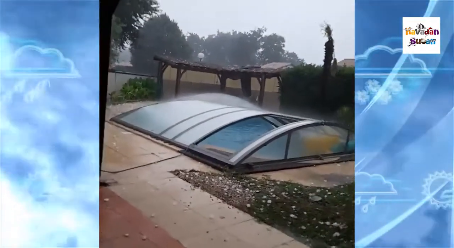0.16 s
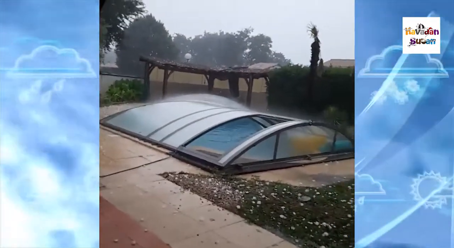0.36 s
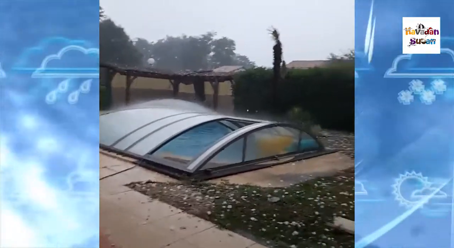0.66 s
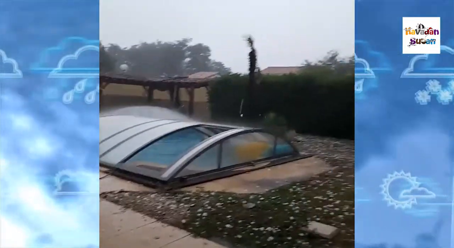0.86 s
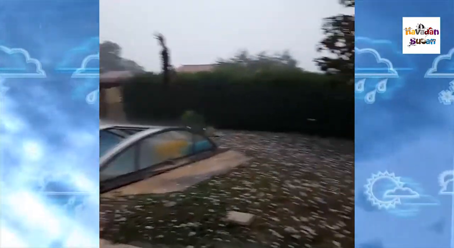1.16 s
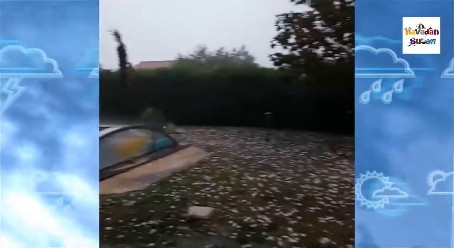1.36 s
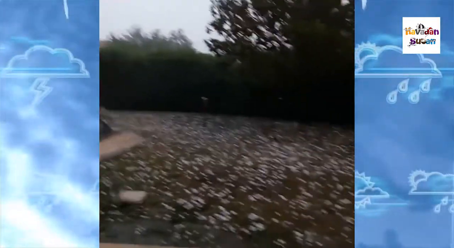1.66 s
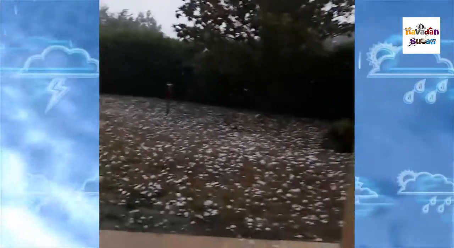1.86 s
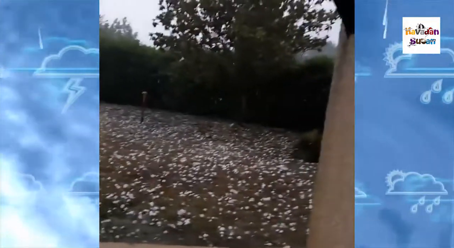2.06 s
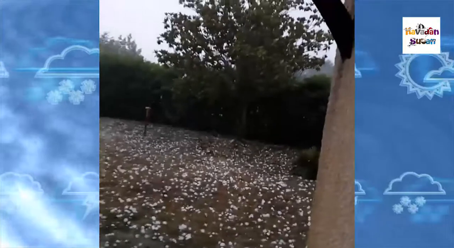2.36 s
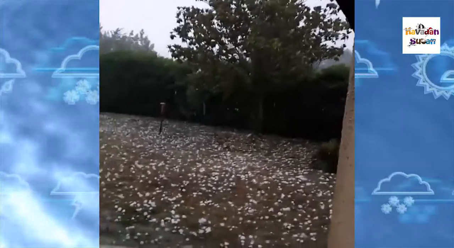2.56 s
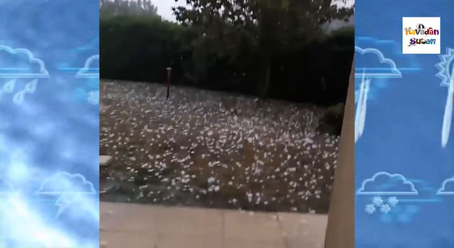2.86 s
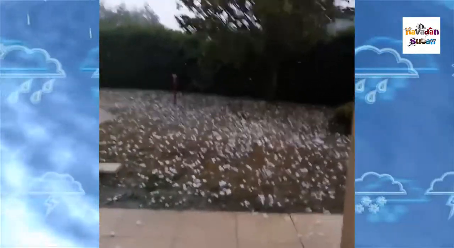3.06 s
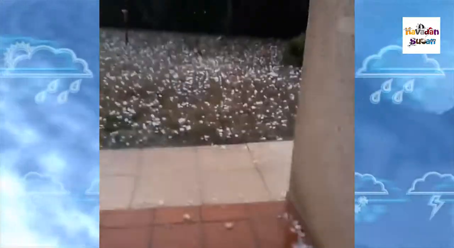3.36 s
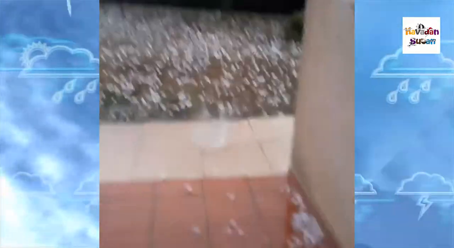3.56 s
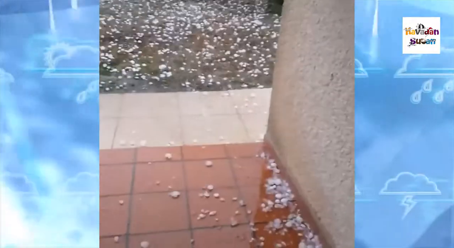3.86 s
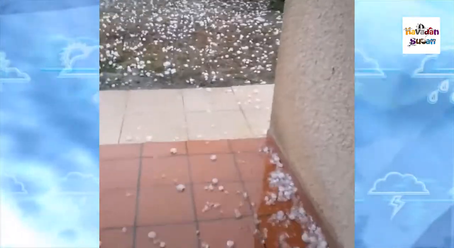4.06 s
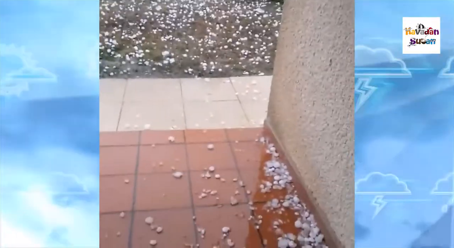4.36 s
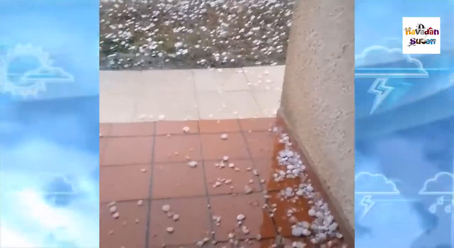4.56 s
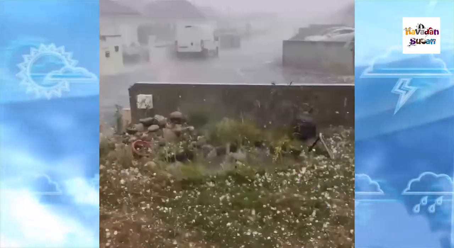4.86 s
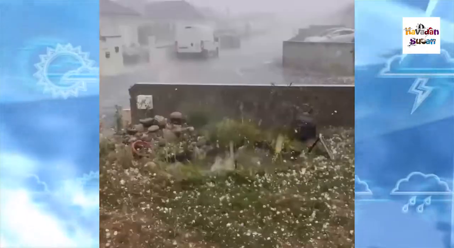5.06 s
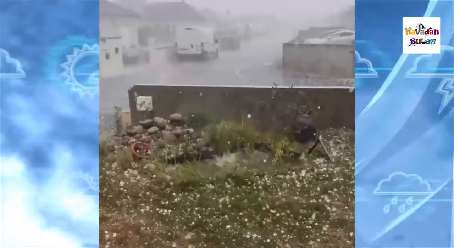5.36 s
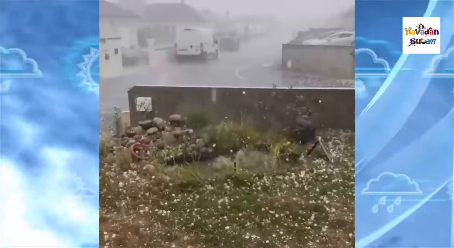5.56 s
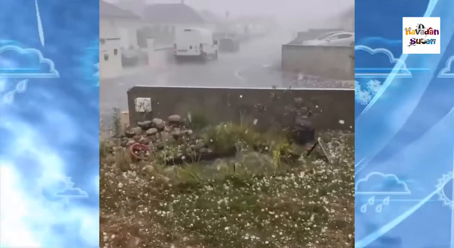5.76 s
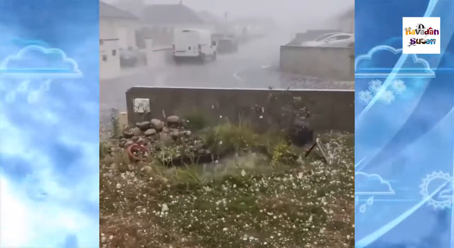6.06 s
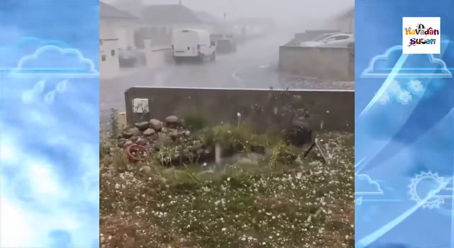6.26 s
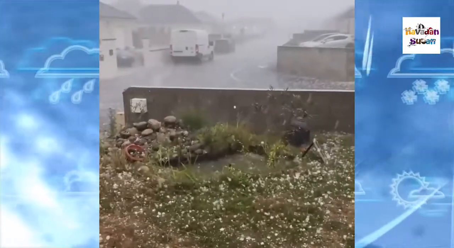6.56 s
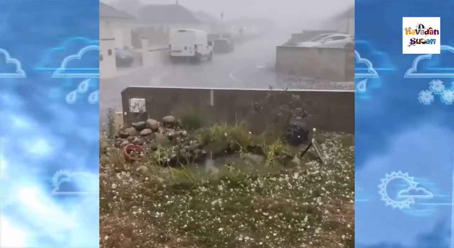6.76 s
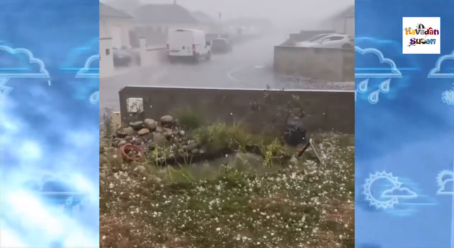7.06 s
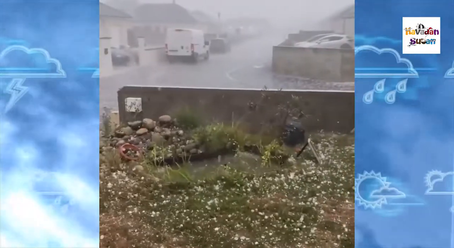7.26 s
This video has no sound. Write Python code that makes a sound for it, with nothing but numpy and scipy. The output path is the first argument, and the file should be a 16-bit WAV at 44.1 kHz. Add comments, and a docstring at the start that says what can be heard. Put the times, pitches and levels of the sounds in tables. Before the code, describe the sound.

Close, loud and chaotic hailstorm, heard from under a roof beside a garden and covered pool. Stones thump overhead, snap on paving and scatter splinters, with an early metallic zing and a bright hollow knock after two seconds. After a tiny gap near 4.9 seconds, the view changes to a street: even, bright hiss, small metal ticks, a few dull single hits and faint house rumble.

```python
"""Hailstorm on a porch roof

Hail drums on a porch roof; big stones thud on it, crack on tiles and knock on garden things, over the patter
on lawn and pool enclosure. After a brief near-silence the street side follows: a steadier hiss, metal pings,
a rumble on the house and duller single stones. Showers are random impulses through decaying noise bursts;
thuds, cracks, knocks and a zing are struck bodies: damped modes and coloured noise with an echo."""
import sys
import numpy as np
from scipy import signal
from scipy.fft import rfft, irfft, next_fast_len
from scipy.io import wavfile
from scipy.ndimage import uniform_filter1d

SR = 44100
rng = np.random.default_rng(int(sys.argv[2]) if len(sys.argv) > 2 else 0)


def master_out(mix):
    """Clip the mix to full scale and print it as 16-bit PCM to the path in sys.argv[1]."""
    frames = np.transpose(np.atleast_2d(mix))
    ceiling = np.clip(frames, -1, 1)
    pcm = np.round(ceiling * 32767).astype(np.int16)
    wavfile.write(sys.argv[1], SR, pcm)


N = 325899
TIME = np.arange(N) / SR
HIT_TIME = np.arange(8192) / SR
HIT_HZ = np.fft.rfftfreq(len(HIT_TIME), 1 / SR)
HIT_TAPER = np.cos(np.pi / 2 * HIT_TIME / HIT_TIME[-1])  # brings every hit to silence at its end
GARDEN_END_S, STREET_START_S = 4.84, 4.912


def amp(db):
    """Level law: decibels to amplitude gain."""
    return 10 ** (np.asarray(db) / 20)


def read(table, hz):
    """Spectral interpolation: a table's columns at the given frequencies, joined on a log axis."""
    table_hz, *columns = np.transpose(table)
    return [np.interp(np.log(hz + 1), np.log(table_hz), column) for column in columns]


def follow(table):
    """Envelope interpolation: a level curve at every sample."""
    return np.interp(TIME, *np.transpose(table))


def swing(level_db, during):
    """Relative level: how far a curve lies above its mean over a stretch of time, in dB."""
    return level_db - level_db[during].mean()


def add(mix, start_s, sound):
    """Superposition: adds a two-channel sound to the mix at its start time."""
    part = mix[:, max(round(start_s * SR), 0):][:, :sound.shape[1]]
    part += sound[:, :part.shape[1]]


def split(x, edge_hz):
    """Band division: the parts of a sound below and above an edge frequency."""
    return [signal.sosfilt(signal.butter(3, edge_hz, kind, fs=SR, output="sos"), x)
            for kind in ("low", "high")]


def evened(x):
    """Power normalisation: removes slow level drift, leaving the mean of the channels at rms 1."""
    return x / np.sqrt(abs(uniform_filter1d(x.mean(0) ** 2, size=6000)) + 1e-12)


def peaked(x):
    """Peak normalisation: the channel mean has rms 1 in its loudest few milliseconds."""
    return x / np.sqrt(uniform_filter1d(x.mean(0) ** 2, size=180).max())


def colour(x, gain_db):
    """Minimum-phase filtering with the gain at HIT_HZ: it rings after a blow, never before."""
    log_gain = np.log(amp(np.maximum(gain_db, gain_db.max() - 90)))
    circle = np.concatenate([log_gain, log_gain[-2:0:-1]])
    # the Hilbert transform of the log gain gives the causal phase
    taps = np.fft.ifft(np.exp(signal.hilbert(circle).conj())).real[:len(HIT_HZ) // 2]
    return signal.oaconvolve(x, taps[None], axes=1)[:, :x.shape[1]]


def resonance_db(hz, q):
    """Resonance curve: the gain at HIT_HZ of one damped mode."""
    ratio = (HIT_HZ + 1) / hz
    return -10 * np.log10(1 + (q * (ratio - 1 / ratio)) ** 2)


# the two microphone ports, on the garden and the street side
# columns: frequency_hz, likeness (0-1), left_phase_lag_rad, left_minus_right_db
GARDEN_SPACING = [(99, 0.97, -0.18, -1), (246, 0.98, -0.047, -1), (405, 0.71, 0.31, -2.5),
                  (686, 0.7, -0.013, 2), (1000, 0.22, -0.44, -2), (2440, 0.31, -0.51, 0.5),
                  (3280, 0, 0.56, -1), (8000, 0.14, -0.54, -0.5)]
STREET_SPACING = [(89.5, 0.98, 0.26, -1), (260, 1, 1.4, -12), (356, 0.59, 0.68, -12), (495, 0.17, 3.6, -8),
                  (545, 0.97, 3.2, 1.5), (666, 0.93, 3.2, 0), (737, 0.74, 3.8, -2), (970, 0.35, 3.8, -3),
                  (1250, 0.98, 4.4, 0.5), (1820, 0.47, 4.1, -3), (2230, 0.89, 3.1, -0.5),
                  (3300, 0.66, 3.66, -3), (3760, 0.53, 4.7, -1), (4230, 0.65, 4.08, -2),
                  (7130, 1, 4.62, -0.5), (13200, 0.27, 0.23, 0.5)]


def ports(x, table):
    """Spatial coherence: mixes two unrelated sounds into two ports, with likeness and lag set by frequency."""
    size = next_fast_len(x.shape[1] + len(HIT_HZ))
    likeness, lag, balance_db = read(table, np.fft.rfftfreq(size, 1 / SR))
    a, b = rfft(x, size)
    common = np.sqrt((1 + likeness) / 2) * a
    apart = np.sqrt((1 - likeness) / 2) * b
    left = (common + apart) * np.exp(-1j * lag) * amp(balance_db / 2)
    right = (common - apart) * amp(-balance_db / 2)
    return irfft(np.array([left, right]), size)[:, :x.shape[1]]


def burst(ring_s, echo_db, echo_t60):
    """Impact and reverberation: a quickly dying rattle with weaker scatter from walls and ground."""
    echo = amp(echo_db) * np.exp(-np.log(1000) * HIT_TIME / echo_t60)
    envelope = np.exp(-HIT_TIME / ring_s) + echo
    return rng.standard_normal((2, len(HIT_TIME))) * envelope * HIT_TAPER


def ringing(gain_db, envelope):
    """Modal density: many close modes sound together as coloured noise under one envelope."""
    x = colour(rng.standard_normal((2, 2 * len(HIT_TIME))), gain_db)
    x = x / np.sqrt(abs(uniform_filter1d(x ** 2, size=440)) + 1e-20)
    return x[:, len(HIT_TIME):] * envelope / envelope.max() * HIT_TAPER


def shower(per_s, spread_db, low_hz, high_hz, q, ring_s, echo_db, echo_t60, count=14):
    """Poisson impacts: stones of random size fall on many surfaces, each with a pitch of its own."""
    out = np.zeros((2, N))
    for hz in np.geomspace(low_hz, high_hz, count):
        tap = colour(burst(ring_s, echo_db, echo_t60), resonance_db(hz, q))
        gap, size = rng.exponential(1, (2, 2000))
        at = (np.cumsum(gap) * count / per_s * SR).astype(int)
        size = amp(spread_db * np.minimum(size, 4))
        blows = np.bincount(at[at < N], size[at < N], N)
        out += signal.oaconvolve(blows[None], tap, axes=1)[:, :N]
    return out / out.std()


def wash(patchy_db):
    """Incoherent summation: far impacts merge into a hiss whose narrow bands flare up for an instant."""
    z = signal.stft(rng.standard_normal((2, N)), nperseg=512, noverlap=384)[2]
    patches = uniform_filter1d(rng.standard_normal(z.shape[1:]), size=3, axis=0)
    patches = uniform_filter1d(patches, size=9, axis=1)
    patched = z * amp(patchy_db * patches / patches.std())
    hiss = signal.istft(patched, nperseg=512, noverlap=384)[1][:, :N]
    return hiss / hiss.std()


def squalls():
    """Beating of slow sines: uneven swells, a few each second, at rms 1."""
    swell = sum(np.sin(2 * np.pi * (hz * TIME + rng.random())) for hz in np.geomspace(2.5, 11, 12))
    return swell / swell.std()


RUMBLE_DB, RUMBLE_FOLLOWS = -35.5, 1.6  # mean level; dB gained per dB of hiss
# colour of the rumble; columns: frequency_hz, gain_db
HOUSE_COLOUR = [(25, -10), (50, -6), (75, 3), (105, -5.5), (145, 2), (215, -9.5), (290, -9), (400, -19),
                (500, -10), (600, -28), (1000, -66), (4000, -95)]


def house_rumble(hiss_db):
    """Structural resonance: low, heavily damped modes of the house rumble with the fall of hail."""
    level_db = RUMBLE_DB + RUMBLE_FOLLOWS * swing(hiss_db, TIME > STREET_START_S)
    blows = shower(per_s=330, spread_db=2.0, low_hz=70, high_hz=597, q=0.43,
                   ring_s=0.0092, echo_db=-20.0, echo_t60=0.17, count=8)
    rumble = ports(colour(blows, read(HOUSE_COLOUR, HIT_HZ)[0]), STREET_SPACING)
    return amp(level_db) * evened(rumble)


SQUALL_DB = 1.1  # rms swing of the hiss level
# hiss of rain and hail on the street, before the squalls; columns: start_s, level_db
STREET_FALL_LEVEL = [(4.92, -31.5), (5.05, -30), (5.4, -31.5), (6.1, -31), (6.27, -33), (6.57, -29.5),
                     (6.67, -31.5), (7.25, -33), (7.39, -30.5)]
# colour of the hiss; columns: frequency_hz, gain_db
STREET_COLOUR = [(200, -30), (420, -10), (500, -2), (545, 0), (585, 6), (650, 0), (720, 6.5), (810, 4),
                 (860, 1), (910, 3.5), (1030, -1), (1130, 1.5), (1230, -1), (1800, 1), (2900, -1),
                 (4000, -4), (5100, -8.5), (6200, -7.5), (7400, -11), (8500, -17.5), (10000, -15.5),
                 (12800, -16.5), (14800, -40)]


def street():
    """Distributed sources: rain and hail hiss on the road and ping on cars and gutters to the right."""
    hiss_db = follow(STREET_FALL_LEVEL)
    ticks = shower(per_s=900, spread_db=1.7, low_hz=900, high_hz=7000, q=2.5,
                   ring_s=.0009, echo_db=-20, echo_t60=.12)
    pings = shower(per_s=650, spread_db=1.7, low_hz=780, high_hz=3400, q=16,
                   ring_s=.002, echo_db=-18, echo_t60=.2, count=20)[0]
    # sound from the right reaches the left port half a millisecond later
    pings = np.array([.8 * np.interp(TIME - .0005, TIME, pings), pings])
    fall = ports(wash(patchy_db=2.6) + amp(-8) * ticks, STREET_SPACING) + amp(-13.5) * pings
    hiss = evened(colour(fall, read(STREET_COLOUR, HIT_HZ)[0]))
    return amp(hiss_db + SQUALL_DB * squalls()) * hiss + house_rumble(hiss_db)


CLATTER_DB, CLATTER_FOLLOWS = -32.5, 0.53  # mean level; dB gained per dB of drumming
# fine spray of small ice and rain on the paving; columns: start_s, level_db
SPRAY_LEVEL = [(0.0, -32.5), (0.3, -29), (0.44, -28), (0.72, -28.5), (0.96, -33), (1.08, -32), (1.4, -31),
               (1.56, -31.5), (1.78, -33), (2.4, -34), (2.56, -32.5), (3.38, -30.5), (3.8, -33),
               (4.0, -29.5), (4.2, -31), (4.33, -28.5), (4.53, -32), (4.83, -27)]
# colour of the patter; columns: frequency_hz, gain_db
GARDEN_COLOUR = [(100, -45), (400, -9.5), (800, 4.5), (1400, 2.5), (2000, -0.5), (3000, -9), (4500, -15),
                 (6000, -14), (7500, -16.5), (8300, -22), (12000, -18.5), (15000, -23.5), (16000, -14.5)]


def garden():
    """Near and far field: close stones clatter, others tap the pool enclosure, over the wash of far ones."""
    clatter_db = CLATTER_DB + CLATTER_FOLLOWS * swing(follow(HAIL_LEVEL), TIME < GARDEN_END_S)
    near = shower(per_s=420, spread_db=2.7, low_hz=600, high_hz=7000, q=1.8,
                  ring_s=.0013, echo_db=-17, echo_t60=.16, count=24)
    taps = shower(per_s=150, spread_db=1.2, low_hz=579, high_hz=1900, q=22,
                  ring_s=.003, echo_db=-8, echo_t60=.2, count=18)
    fall = amp(-7.5) * near + amp(-13) * taps + wash(patchy_db=4)
    fall = ports(colour(fall, read(GARDEN_COLOUR, HIT_HZ)[0]), GARDEN_SPACING)
    clatter, spray = split(fall, 3300)
    return amp(clatter_db) * evened(clatter) + amp(follow(SPRAY_LEVEL)) * evened(spray)


def by_wall(s):
    """Listening position: the listener turns from the porch's edge (0) to its side wall (1)."""
    return np.interp(s, [1.6, 2.5], [0, 1])


HOLLOW_SHARE = 0.37  # part of the drumming's power in the hollow upper tone
# drumming of hail on the porch; columns: start_s, level_db
HAIL_LEVEL = [(0.0, -27), (0.2, -26.5), (0.42, -17.5), (0.85, -20), (0.98, -22), (1.15, -18), (1.41, -19.5),
              (1.57, -16), (1.8, -27.5), (2.42, -27.5), (2.58, -21.5), (2.92, -20.5), (3.02, -16.5),
              (3.35, -21.5), (3.5, -23.5), (3.82, -27.5), (4.23, -25), (4.33, -17.5), (4.5, -26),
              (4.68, -17.5), (4.83, -20.5)]
# the roof's ring; columns: frequency_hz, gain_at_edge_db, gain_by_wall_db
ROOF_RING = [(25, -32, -43), (38, -16, -22), (50.6, -6, -11), (79, -0.5, 0.5), (93, -0.5, 1),
             (138.3, -3, -1), (195, -9, -12.5), (204, -4.5, -14.5), (231, -2, -5), (300, -7, -4),
             (380, -7.5, -7), (464, -4, -10), (717, -11.5, -11), (750, -16, -15.5), (1580, -15, -21),
             (8200, -75, -85)]


def roof():
    """Panel resonance: countless stones drum on the roof as a boom and a hollow upper tone."""
    blows = shower(per_s=520, spread_db=2.0, low_hz=64.0, high_hz=1510, q=0.55,
                   ring_s=0.0057, echo_db=-13.5, echo_t60=0.17, count=12)
    panes = shower(per_s=130, spread_db=2, low_hz=200, high_hz=750, q=14,
                   ring_s=.003, echo_db=-20, echo_t60=.25, count=13)
    struck = blows + amp(-5.0) * panes
    edge, wall = (colour(struck, gain_db) for gain_db in read(ROOF_RING, HIT_HZ))
    panel = ports(edge + by_wall(TIME) * (wall - edge), GARDEN_SPACING)
    boom, hollow = split(panel, 190)
    drumming = np.sqrt(1 - HOLLOW_SHARE) * evened(boom) + np.sqrt(HOLLOW_SHARE) * evened(hollow)
    return amp(follow(HAIL_LEVEL)) * drumming


KNOCK_RING_S, KNOCK_ECHO_RISE_S, KNOCK_ECHO_S = 0.0043, 0.009, 0.06
CLUNK_DB = -10  # broad body of a knock, against its ring
# what a struck thing rings with; columns: pitch_ratio (to the knock's pitch), gain
KNOCK_PARTIALS = [(.91, 0.58), (1.064, 0.74), (2.3, 0.047)]


def knock(hz, echo_db):
    """Modal ringing: two close modes and a faint upper one over a broad clunk; a lower echo lingers."""
    age = HIT_TIME / KNOCK_RING_S
    modes = sum(gain * np.sin(2 * np.pi * hz * ratio * HIT_TIME) for ratio, gain in KNOCK_PARTIALS)
    ring = age * np.exp(-age) * modes
    scatter = (1 - np.exp(-HIT_TIME / KNOCK_ECHO_RISE_S)) ** 2 * np.exp(-HIT_TIME / KNOCK_ECHO_S)
    echo = ringing(2 * resonance_db(hz * 0.9, q=2.8), scatter)
    clunk = ringing(resonance_db(hz, q=1.2), np.sqrt(age) * np.exp(-age / 2))
    return peaked(np.array([ring, .5 * ring])) + amp(echo_db) * echo + amp(CLUNK_DB) * clunk


# stones on hollow or metal things; columns: start_s, level_db, pitch_hz, echo_db (against the ring)
KNOCK_HITS = [(0.408, -18, 1180, -6), (0.411, -27, 1634, -5), (0.872, -23, 940, -6),
              (1.226, -15.5, 678, -10), (1.36, -20.5, 940, -8), (1.432, -23.5, 1330, -5),
              (1.467, -27, 1320, -4.5), (1.552, -20, 674, -6), (2.197, -11.5, 1250, -8.5),
              (2.745, -27, 990, -3), (3.849, -18, 1160, -9), (3.864, -18.5, 1245, -6),
              (3.884, -27, 1720, -3), (3.891, -24, 1290, -10), (4.612, -32, 1080, -12),
              (5.035, -27.5, 1730, -8), (5.428, -34, 980, -7), (5.511, -30.5, 1980, -4),
              (5.597, -31, 2650, -12), (5.664, -29, 3710, -7), (5.712, -29, 2300, -12),
              (5.788, -29.5, 1850, -9), (5.897, -30.5, 3270, -16), (6.062, -31, 1890, -6),
              (6.478, -30, 1890, -1), (6.572, -29, 2830, -8), (6.731, -36, 1840, 2),
              (6.79, -30.5, 1170, -17), (6.808, -27.5, 1950, -7), (7.176, -32, 1820, -9),
              (7.346, -29, 925, -5)]


def knocks():
    """Struck hollow bodies: each stone sounds the pitch of the thing it hits."""
    out = np.zeros((2, N))
    for start_s, level_db, hz, echo_db in KNOCK_HITS:
        add(out, start_s, amp(level_db) * knock(hz, echo_db))
    return out


ZING_START_S, ZING_DB, ZING_FADE_S = .171, -21, 0.018
ZING_HZ, ZING_SAG_HZ_PER_S, ZING_WIDTH_HZ = 2820, 6300, 640
ZING_ECHO_DB, ZING_ECHO_S = 4, 0.056  # scatter off the walls


def zing():
    """Frequency glide: a stone glances off metal with a sinking ring, trailed by its rougher echo."""
    turn = np.exp(2j * np.pi * np.cumsum(ZING_HZ - ZING_SAG_HZ_PER_S * HIT_TIME) / SR)
    ring = turn.real * (1 - np.exp(-HIT_TIME / KNOCK_RING_S)) * np.exp(-HIT_TIME / ZING_FADE_S)
    smooth = signal.butter(3, ZING_WIDTH_HZ / 2, fs=SR, output="sos")
    real, imaginary = rng.standard_normal((2, 2, len(HIT_TIME)))
    flutter = signal.sosfilt(smooth, real + 1j * imaginary)
    scatter = (1 - np.exp(-HIT_TIME / KNOCK_ECHO_RISE_S)) ** 2 * np.exp(-HIT_TIME / ZING_ECHO_S)
    echo = (flutter / flutter.std() * turn).real * scatter
    return amp(ZING_DB) * (np.outer([2, 0], ring) + amp(ZING_ECHO_DB) * echo)


# first contact against the rattle (dB) at a reference clack level (dB), and dB gained per dB of clack
CONTACT_DB, CONTACT_AT_DB, CONTACT_GROWS = 15.5, -20, .55
# colours of a crack's clack and snap; columns: frequency_hz, gain_db
CLACK_COLOUR = [(150, -10.5), (600, -2.5), (1300, -2.5), (2500, -5), (4000, 0.5), (8000, -36)]
SNAP_COLOUR = [(800, -33), (3000, -1.5), (4500, 3.5), (6500, 5.5), (8500, -5), (13000, -2.5), (16000, -3)]


def crack(clack_db, snap_db):
    """Brittle impact: a contact that is sharper the harder the hit, then a rattle and the porch's echo."""
    ice = burst(ring_s=.0035, echo_db=-8, echo_t60=.16)
    ice[0, 4] += amp(CONTACT_DB + CONTACT_GROWS * (clack_db - CONTACT_AT_DB))
    clack = peaked(colour(ice, read(CLACK_COLOUR, HIT_HZ)[0]))
    snap = peaked(colour(ice, read(SNAP_COLOUR, HIT_HZ)[0]))
    return amp(clack_db) * clack + amp(snap_db) * snap


SKITTER_S = 0.028  # time in which the splinters lose two thirds of their power
# colour of the splinters; columns: frequency_hz, gain_db
SPLINTER_COLOUR = [(300, -5.5), (1100, 5), (3000, -4), (6500, -7.5), (8500, -13.5), (15000, -11.5)]


def splinters():
    """Exponential energy decay: pieces of each shattered stone bounce on and quickly come to rest."""
    start_s, _, _, level_db = np.transpose(CRACK_HITS)
    thrown = np.bincount((start_s * SR).astype(int), amp(level_db) ** 2, N)
    power = signal.lfilter([1], [1, -np.exp(-1 / (SKITTER_S * SR))], thrown)
    bits = shower(per_s=1800, spread_db=1.2, low_hz=700, high_hz=12000, q=2,
                  ring_s=.0016, echo_db=-12, echo_t60=.16, count=8)
    return np.sqrt(power) * evened(colour(bits, read(SPLINTER_COLOUR, HIT_HZ)[0]))


# stones that shatter on tiles, paving and road; columns: start_s, clack_db, snap_db, splinters_db
CRACK_HITS = [(0.089, -29, -24.5, -27), (0.237, -32, -28, -27.5), (0.407, -34, -46, -23),
              (0.542, -27, -24, -28), (0.64, -29, -23, -24), (0.71, -29, -24, -29), (0.745, -34, -45, -28),
              (0.86, -30, -43, -29), (1.046, -26, -25.5, -28), (1.177, -43, -42, -23),
              (1.227, -27, -32, -30), (1.433, -41, -42, -34), (1.461, -30, -29, -20.5),
              (1.536, -29, -26, -22), (1.553, -22, -34, -30), (1.893, -21, -16, -22.5),
              (2.106, -30, -28, -34.5), (2.313, -26, -18.5, -46), (2.455, -23.5, -20.5, -25.5),
              (2.979, -41, -31, -23.5), (3.148, -19, -18.5, -28), (3.387, -36, -36, -25),
              (3.529, -22, -32, -24.5), (3.586, -19.5, -38, -21.5), (3.612, -12, -16.5, -44),
              (3.988, -26.5, -38, -25.5), (4.087, -16, -20, -30.5), (4.289, -33, -38, -22.5),
              (4.478, -18, -24.5, -28), (4.828, -34, -35, -44), (5.318, -31, -45, -36),
              (5.714, -22, -24.5, -41), (5.9, -30, -35, -52), (6.037, -33, -40, -46),
              (6.064, -26, -31, -37), (6.475, -41, -41, -48), (6.497, -44, -31, -40),
              (6.571, -25, -30, -39), (6.97, -32, -28, -51)]


def cracks():
    """Brittle fracture: stones clack and snap on hard ground, and their splinters scatter."""
    out = splinters()
    for start_s, clack_db, snap_db, _ in CRACK_HITS:
        add(out, start_s, crack(clack_db, snap_db))
    return out


THUD_RISE_S = 0.004955  # the blow takes this long to spread through the roof
THUD_Q, THUD_ECHO_DB, THUD_ECHO_T60_S = 1.0, -12.5, .5
THUD_SLAP_DB = -8.5  # broad slap of a blow, against the struck place's resonance


def thud(start_s, hz, ring_s, boom_share):
    """Local plate resonance: the struck place booms while the blow spreads through the roof and dies."""
    edge_db, wall_db = read(ROOF_RING, HIT_HZ)
    roof_db = edge_db + by_wall(start_s) * (wall_db - edge_db)
    rise = 1 - np.exp(-(HIT_TIME / THUD_RISE_S) ** 2)
    age = np.maximum(HIT_TIME - 2.6 * THUD_RISE_S, 0)  # decay begins once the blow has spread
    fade = np.exp(-age / ring_s)
    echo = amp(THUD_ECHO_DB) * np.exp(-np.log(1000) * age / THUD_ECHO_T60_S)
    spread = rise * (np.sqrt(1 - boom_share) * fade + echo) / (1 + amp(THUD_ECHO_DB))
    place_db = np.maximum(resonance_db(hz, THUD_Q), THUD_SLAP_DB)
    rattle = spread.max() * ringing(roof_db + place_db, spread)
    boom = np.sqrt(2 * boom_share) * rise * fade * np.sin(2 * np.pi * hz * HIT_TIME) * HIT_TAPER
    return rattle + np.outer([1, 0], boom)


# big stones on the roof
# columns: start_s, level_db, pitch_hz (of the struck place), ring_s, boom_share (of the power, 0-1)
THUD_HITS = [(0.106, -14.5, 127, 0.017, 0.01), (0.233, -18.5, 542, 0.022, 0.1),
             (0.26, -15, 231, 0.015, 0.16), (0.338, -23, 208, 0.019, 0.1), (0.398, -12, 226, 0.02, 0),
             (0.426, -14.5, 237, 0.024, 0.2), (0.542, -11, 220, 0.012, 0.46),
             (0.575, -16, 169, 0.0076, 0.8), (0.65, -8.5, 233, 0.0089, 0.5), (0.667, -9, 257, 0.0052, 0.8),
             (0.698, -21, 167, 0.012, 0.8), (0.727, -16, 141, 0.015, 0.1), (0.755, -8.5, 187, 0.012, 0.54),
             (0.774, -13, 127, 0.034, 0.3), (0.797, -10.5, 112, 0.015, 0.4), (0.854, -10, 198, 0.037, 0.17),
             (0.912, -14, 97, 0.016, 0.3), (0.957, -16, 139, 0.01, 0.6), (1.01, -16.5, 137, 0.063, 0),
             (1.052, -12.5, 512, 0.016, 0.18), (1.071, -10.5, 128, 0.028, 0.7),
             (1.122, -20, 144, 0.016, 0.2), (1.17, -17, 287, 0.019, 0.14), (1.205, -19, 260, 0.02, 0.05),
             (1.222, -15, 108, 0.027, 0.07), (1.432, -18, 236, 0.01, 0.2), (1.473, -16, 218, 0.023, 0.1),
             (1.51, -11.5, 135, 0.022, 0.03), (1.548, -10.5, 138, 0.035, 0.08),
             (1.606, -14, 112, 0.025, 0.4), (1.654, -14.5, 110, 0.03, 0.4), (1.752, -18, 101, 0.01, 0.9),
             (1.941, -16.5, 263, 0.079, 0), (2.005, -17, 227, 0.061, 0.13), (2.168, -19.5, 137, 0.028, 0.3),
             (2.444, -18.5, 266, 0.008, 0.4), (2.48, -14.5, 100, 0.017, 0.2),
             (2.556, -10.5, 106, 0.029, 0.77), (2.592, -8.5, 127.5, 0.039, 0.4), (2.663, -12, 96, 0.015, 1),
             (2.75, -11.5, 224, 0.034, 0.15), (2.802, -9.5, 93, 0.029, 0.35), (2.964, -16, 334, 0.011, 0),
             (2.976, -9, 306, 0.0092, 0.33), (3.051, -14, 237, 0.021, 0.02), (3.093, -14, 230, 0.031, 0.4),
             (3.219, -14.5, 248, 0.014, 0.8), (3.401, -11.5, 145, 0.041, 0.02),
             (3.439, -18.5, 227, 0.022, 0), (3.454, -10.5, 130, 0.021, 0.74),
             (3.564, -19.5, 140, 0.048, 0.76), (3.889, -21.5, 305, 0.032, 0.15),
             (3.916, -19, 100, 0.018, 0.3), (3.944, -19.5, 294, 0.05, 0), (4.012, -20, 142, 0.016, 0.7),
             (4.142, -19, 124, 0.016, 0.5), (4.162, -18, 73.6, 0.027, 0.64), (4.274, -16, 140, 0.009, 0.05),
             (4.33, -21.5, 266, 0.026, 0.08), (4.368, -20, 100.5, 0.024, 0.2),
             (4.427, -16.5, 99.4, 0.044, 0.75), (4.533, -17, 267, 0.064, 0.04),
             (4.592, -12, 96, 0.028, 0.53), (4.626, -7.5, 263.3, 0.02, 0.5), (4.667, -19, 148, 0.038, 0.4),
             (4.723, -11.5, 273, 0.042, 0), (5.107, -34, 156, 0.012, 0.8), (5.322, -25.5, 137, 0.012, 0.4),
             (5.612, -33, 153, 0.019, 0.2), (5.713, -27.5, 266, 0.006, 0.2), (5.729, -23, 156, 0.022, 0.25),
             (6.538, -25.5, 161, 0.04, 0.5), (6.806, -30.5, 84, 0.061, 0.6)]


def thuds():
    """Plate excitation: each big stone strikes the roof at a place with its own pitch and damping."""
    out = np.zeros((2, N))
    for start_s, level_db, hz, ring_s, boom_share in THUD_HITS:
        add(out, start_s - THUD_RISE_S, amp(level_db) * thud(start_s, hz, ring_s, boom_share))
    return out


def big_stones():
    """Superposed impacts: the single stones that stand out, heard at the two ports."""
    out = knocks() + cracks() + thuds()
    add(out, ZING_START_S, zing())
    return ports(out, GARDEN_SPACING)


def scene():
    """Gated superposition: the garden side, a near-silence, then the street side with duller stones."""
    # a faint trace of the garden side stays under the rest
    in_garden = np.clip((GARDEN_END_S - TIME) / 0.0088 + 1, amp(-47.5), 1)
    in_street = np.clip((TIME - STREET_START_S) / 0.007, 0, 1)
    stones = big_stones()
    dull_stones = signal.sosfilt(signal.butter(2, 10500, fs=SR, output="sos"), stones)
    return in_garden * (roof() + garden() + stones) + in_street * (street() + dull_stones)


LOW_CUT_HZ, EDGE_HZ = 35, 15700  # lower and upper band limits


def record(dry):
    """Band limiting and saturation: deep bass is lost, loud peaks are rounded, then the treble is cut off."""
    dry = signal.sosfilt(signal.butter(2, LOW_CUT_HZ, "high", fs=SR, output="sos"), dry)
    rounded = dry / (1 + dry ** 8) ** (1 / 8)
    taps = signal.firwin(511, EDGE_HZ, window=("kaiser", 9), fs=SR)
    return signal.oaconvolve(rounded, taps[None], "same")


dry = scene()
out = record(dry)
master_out(out)
```